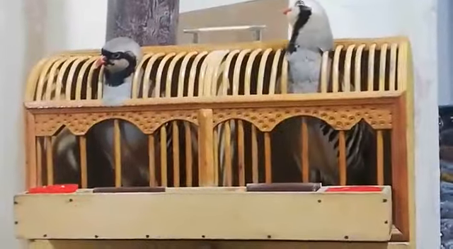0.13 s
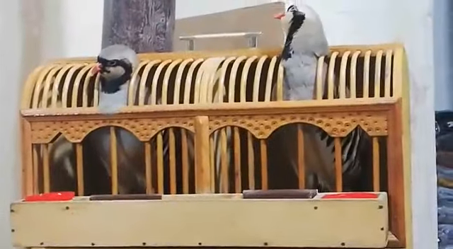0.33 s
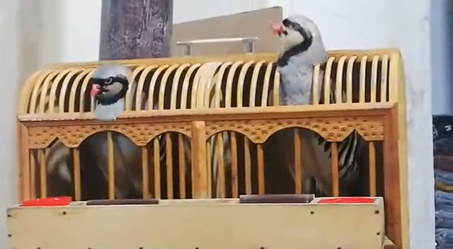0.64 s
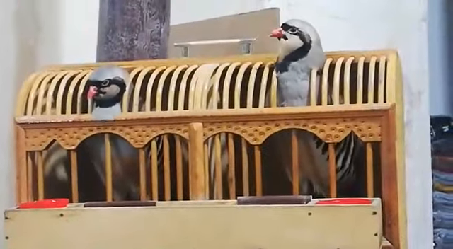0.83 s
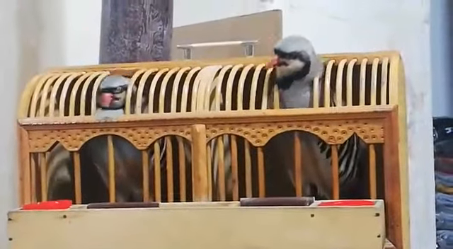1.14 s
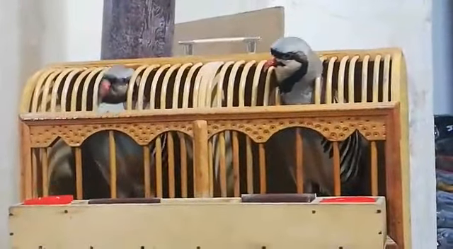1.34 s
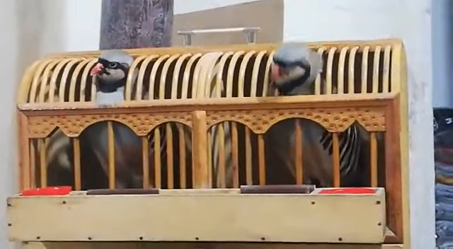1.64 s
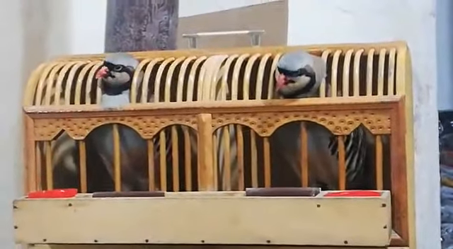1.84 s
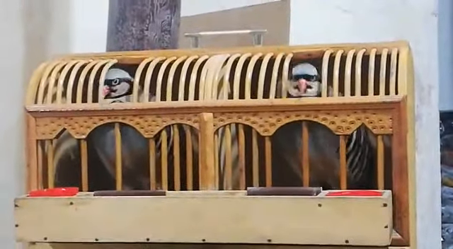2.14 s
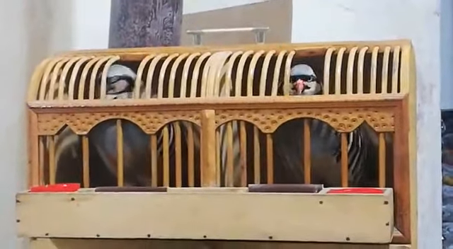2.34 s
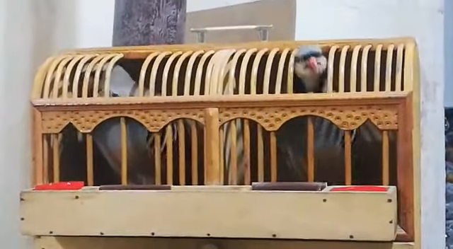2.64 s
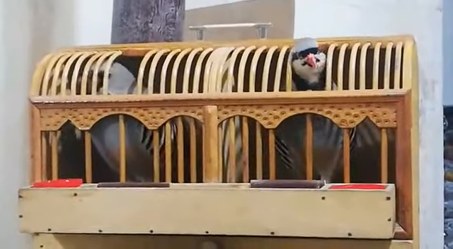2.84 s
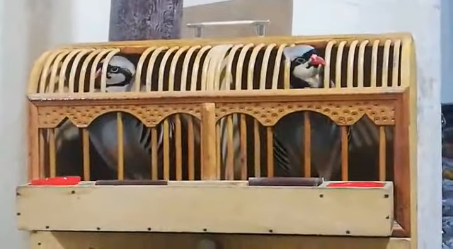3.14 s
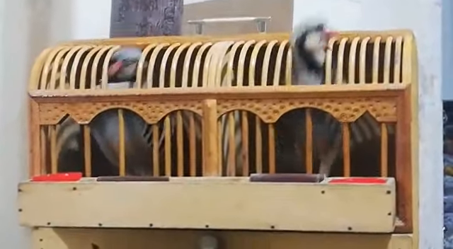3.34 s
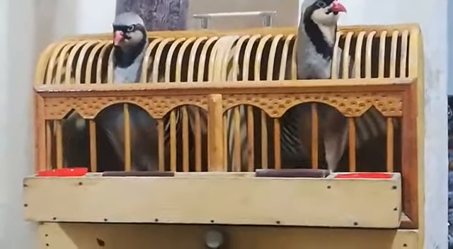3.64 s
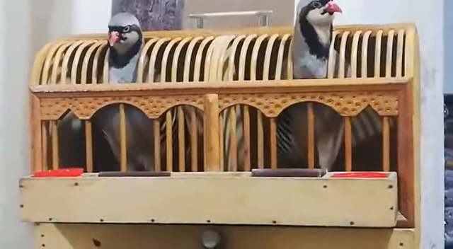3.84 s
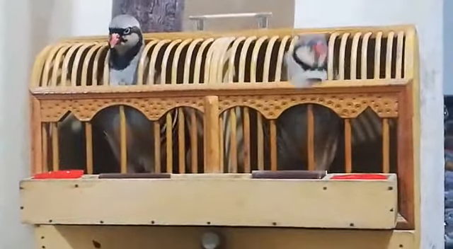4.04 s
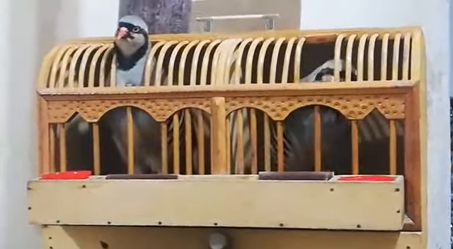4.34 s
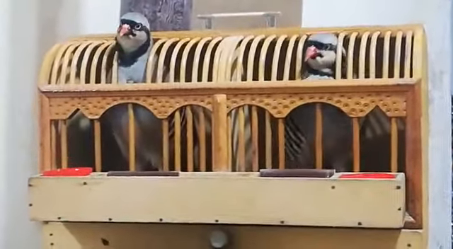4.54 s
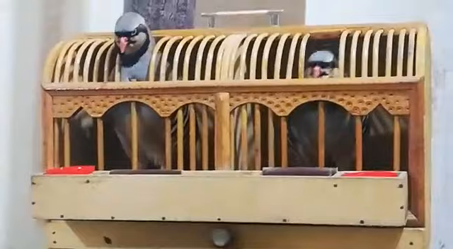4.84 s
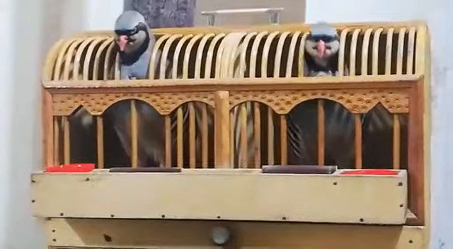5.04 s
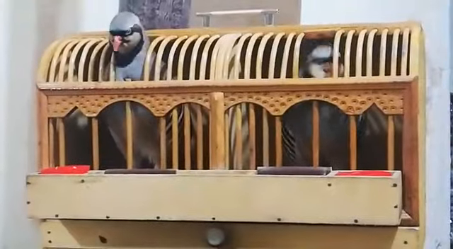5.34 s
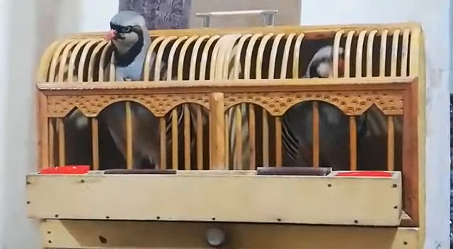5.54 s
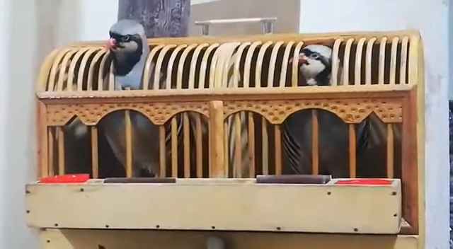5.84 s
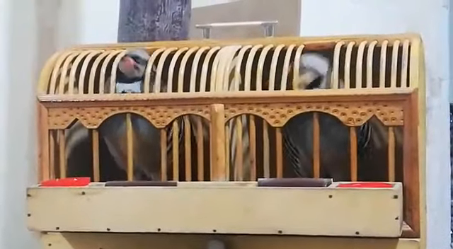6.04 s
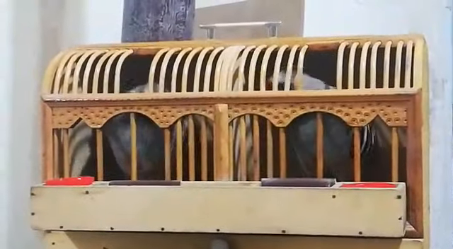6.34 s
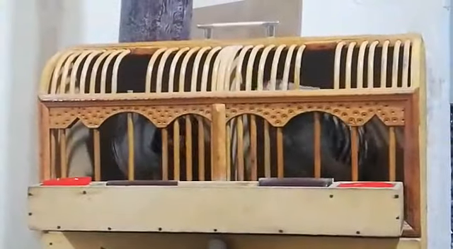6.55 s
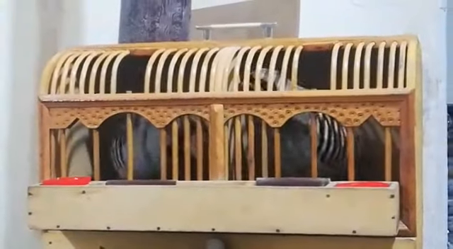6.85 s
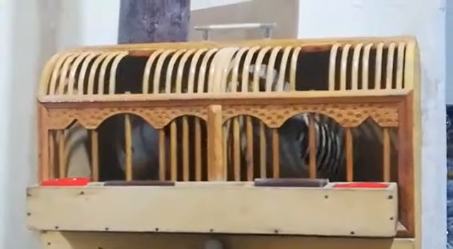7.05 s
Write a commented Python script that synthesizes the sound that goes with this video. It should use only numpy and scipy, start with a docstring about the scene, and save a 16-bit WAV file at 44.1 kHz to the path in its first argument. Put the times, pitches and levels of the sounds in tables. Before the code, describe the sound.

Two caged partridges give rasping, arching squeals and hollow low clucks, thickening into steady clucking chatter, with shuffling and light wooden bumps in a small room.

```python
"""Two partridges squabble in a wooden cage in a small, hard room, close to a two-port microphone.
Rasping squeals, most of them arching to 3-4 kHz, collapse into a croak: harmonics, half tones and noisy air.
Short hollow clucks, harmonics swept through a throat resonance, fall between them.
Shuffling is gusty filtered noise; bumps are a noise tick and decaying cage modes; two faint whistles are sine glides.
Each bird or cage sound meets fresh random echoes, over quiet room tone."""
import sys
import numpy as np
from scipy import signal
from scipy.fft import rfft, irfft
from scipy.io import wavfile
from scipy.ndimage import uniform_filter1d

SR = 44100
rng = np.random.default_rng(int(sys.argv[2]) if len(sys.argv) > 2 else 0)


def wav_out(sig):
    """Save sig, one row per channel (or a flat mono array), as 16-bit PCM at SR to the path in sys.argv[1]."""
    wavfile.write(sys.argv[1], SR, np.round(np.clip(np.atleast_2d(sig).T, -1, 1) * 32767).astype(np.int16))


N = 316805

# Squeals of the birds. Each row: start in seconds, rise in seconds, fall in seconds, croak in seconds,
# foot pitch in Hz, top pitch in Hz, level at the top in dB, level where the croak starts in dB, base rasp (0-1),
# overtone slope in dB per octave before loudness brightens it, left minus right in dB before the port tilt.
SQUEAL_NOTES = [ (0.052, 0.054, 0.045, .02, 2664, 2900, -35.5, -46, 0.26, -9, -2),
                (0.067, 0.017, 0.031, 0.021, 3180, 3874, -35, -35.5, 0.4, -16, -1),
                (0.158, .015, 0.062, 0.031, 1450, 1610, -34, -33.5, 0.59, -7, 0.5),
                (0.33, 0.049, 0.037, 0.033, 1350, 1828, -37.5, -35, 0.53, -6.5, 0.5),
                (0.358, 0.022, .035, 0.017, 2700, 2880, -38, -40, 0.23, -9, 3),
                (0.434, .027, .062, .042, 3817, 4130, -33, -32, 0.45, -12.5, 2),
                (0.557, 0.033, 0.037, .02, 2490, 2836, -30.5, -33.5, 0.42, -9.5, -1),
                (0.672, .02, 0.077, 0.035, 1496, 1682, -29, -39.5, 0.64, -9, -1),
                (0.912, .055, 0.032, 0.019, 3380, 4160, -32, -69, 0.04, -18.5, 3.5),
                (1.008, 0.0052, 0.0049, 0.027, 2045, 2214, -38, -30.5, 0.17, -6.5, 0.5),
                (1.01, .04, .03, 0.051, 2127, 3690, -29.5, -32, 0.13, -10.5, -0.5),
                (1.238, 0.038, 0.027, 0.031, 2652, 2835, -30, -36.5, 0.37, -10.5, 2),
                (1.286, 0.026, 0.041, 0.056, 3685, 3940, -31.5, -30, 0.14, -15, 2),
                (1.52, 0.03, 0.0072, 0.058, 2496, 3843, -26, -35, 0, -11.5, -1),
                (1.567, 0.015, .048, .02, 2685, 2834, -31, -59, .45, -9, 1),
                (1.634, 0.026, 0.043, .05, 3720, 3930, -29.5, -30.5, 0.2, -10, 2),
                (1.896, 0.038, 0.011, 0.023, 2597, 3275, -35, -36.5, .2, -9, 1),
                (1.953, 0.034, 0.061, 0.056, 2684, 3890, -26, -27, 0.4, -9, 0),
                (2.246, 0.055, 0.041, 0.037, 2903, 3564, -28, -31, 0.17, -9, 1),
                (2.445, 0.044, 0.091, 0.045, 2830, 4103, -30.5, -27.5, 0.31, -8.5, 0.5),
                (3.037, 0.031, 0.042, 0.033, 2600, 3513, -28, -34.5, 0.02, -10, -1),
                (3.288, 0.02, 0.035, 0.032, 2643, 3350, -31.5, -32.5, 0.61, -9.5, -1.5),
                (3.67, 0.033, 0.051, .05, 2800, 4010, -28, -32.5, 0, -5.5, 0.5),
                (3.912, 0.039, 0.038, 0.033, 2290, 3104, -34.5, -35.5, 0.4, -8.5, -0.5),
                (4.347, 0.044, 0.037, 0.044, 2907, 3686, -31.5, -33.5, 0.1, -7.5, 0),
                (4.785, .033, 0.029, 0.037, 2700, 3438, -28.5, -38, 0.06, -11, 1.5),
                (5.107, .035, 0.046, 0.024, 2728, 2852, -30, -31, .08, -8, -1.5),
                (5.539, 0.037, 0.056, 0.034, 2677, 3340, -27.5, -31, 0, -7, -0.5),
                (5.697, .035, .08, 0.024, 2403, 3188, -31, -30.5, 0.33, -5.5, 2.5),
                (5.835, 0.04, 0.038, 0.06, 2904, 3047, -26.5, -34, 0.17, -8, -3),
                (6.263, 0.026, 0.056, 0.087, 2900, 3279, -26, -37, 0.04, -7, -1.5)]
# Clucks of the birds. Each row: start in seconds, length scale in seconds, reference pitch in Hz,
# level in dB before the swell and a small common boost, lift of the overtones as the beak opens in dB.
CLUCK_NOTES = [(0.0, 0.0096, 671, -40.5, 27.5), (0.876, 0.034, 609, -45.5, 22),
               (1.456, 0.035, 646, -37.5, 20.5), (1.572, 0.061, 746, -46.5, 45),
               (1.807, 0.03, 655.5, -34.5, 19.5), (1.873, 0.036, 647, -39, 22.5),
               (2.302, 0.028, 731, -37, -8), (2.673, 0.027, 686, -41.5, 19), (2.856, 0.037, 928, -34, 8.5),
               (3.172, 0.023, 985, -33.5, 10.5), (3.259, 0.032, 1032, -41, 0), (3.489, 0.059, 969, -35, 2),
               (3.568, 0.035, 1020, -38.5, 4), (3.75, 0.095, 1012, -40.5, 16), (3.922, 0.04, 757, -39, -27),
               (4.025, 0.035, 1028, -35, 13.5), (4.102, 0.032, 999, -37.5, -19),
               (4.21, 0.045, 654, -30.5, 3.5), (4.386, 0.024, 868, -36.5, 5), (4.486, 0.038, 754, -38, 9),
               (4.521, 0.032, 613, -36.5, 8), (4.671, 0.036, 633.3, -29.5, 5),
               (4.708, 0.027, 587.4, -34, 10), (4.865, 0.028, 874, -34.5, 22),
               (4.967, 0.045, 856, -33.5, 8), (5.163, 0.041, 641.5, -30.5, 14.5),
               (5.239, 0.025, 558, -31.5, -2), (5.396, 0.047, 883, -34.5, 8.5),
               (5.525, 0.04, 980, -33, -16), (5.725, 0.032, 708, -32.5, 17.5),
               (5.837, 0.0356, 595, -31.5, -7), (6.01, 0.048, 693, -30, 14),
               (6.123, 0.031, 585, -28.5, 14.5), (6.309, 0.044, 691, -32.5, 16),
               (6.422, 0.032, 654.4, -40, 21.5), (6.441, 0.027, 573.5, -31.5, -17),
               (6.578, 0.015, 872, -38.5, -20), (6.618, 0.031, 752, -33.5, 11.5),
               (6.683, 0.024, 918, -39, 13), (6.73, 0.033, 739, -37.5, 4), (6.758, 0.028, 609, -33.5, 12.5),
               (6.888, 0.037, 876, -42.5, 12), (6.928, 0.027, 716, -33.5, 12.5),
               (7.036, 0.028, 803, -34.5, -23), (7.07, 0.022, 587, -28, 14.5)]
# Feet and bodies hitting the cage. Each row: start in seconds, tick level in dB, thud level in dB
# (the thud is added to the level of each cage mode).
CAGE_BUMPS = [(0.085, -47, -56.5), (1.564, -41, -49.5), (2.774, -40.5, -57), (3.307, -36.5, -51.5),
              (4.059, -63, -49), (6.913, -45, -50), (6.963, -34, -55), (7.043, -35, -70)]
# Feathers and feet shuffling, joined by straight lines. Each row: time in seconds, level in dB.
SHUFFLE_LEVEL = [(0, -71.5), (3.2, -61.5), (3.85, -53.5), (4.5, -60), (6.85, -62.5), (6.95, -48.5),
                 (7.18, -59)]
# Throat resonance over the squeal's harmonics. Each row: frequency in Hz, gain in dB.
SQUEAL_THROAT_SPECTRUM = [(350, -25), (650, 1), (1500, 11.5), (2300, 1.5), (3100, 2), (4000, 4), (4900, 3),
                          (5800, -4.5), (7000, -5), (9500, -15.5), (12500, -3), (15500, -26)]
# Breath noise in a pressed squeal. Each row: frequency in Hz, gain in dB.
RASP_AIR_SPECTRUM = [(400, -46), (700, -49), (1500, 6), (2300, 3), (3200, 7.5), (4100, -2), (5000, -1.5),
                     (7000, -10.5), (9500, -13), (12500, -33), (15500, -22)]
# Hollow throat resonance of the cluck. Each row: frequency in Hz, gain in dB.
CLUCK_THROAT_SPECTRUM = [(240, -17.5), (450, -26.5), (620, -8.5), (900, 6.5), (1200, 10), (1500, -2),
                         (1900, -23), (2700, -27.5), (4400, -31), (5400, -35), (6600, -37), (11000, -50.5)]
# Colour of the shuffling. Each row: frequency in Hz, gain in dB.
RUSTLE_SPECTRUM = [(70, -17.5), (200, -1), (1000, -7.5), (3000, -15), (15000, -37.5)]
# Colour of the steady room tone. Each row: frequency in Hz, gain in dB.
ROOM_TONE_SPECTRUM = [(20, 0), (60, 10), (200, -6.5), (700, 14), (2000, -27.5), (6000, -11), (15000, -19)]
# Ringing modes of the wooden cage. Each row: centre frequency in Hz, relative level in dB, 60 dB decay in seconds.
CAGE_MODES = [(138.3, -3, 0.25), (211, 1, 0.3), (294, 8.5, 0.085), (387, 9, 0.084), (810, 24.5, 0.0095)]
# Colour difference between the ports. Each row: frequency in Hz, left minus right in dB.
PORT_TILT = [(150, -1.5), (600, 5.5), (1400, -2.5), (2800, -3), (4500, 5), (7500, 2), (12500, -4.5)]
# Thin far whistles. Each row: start in seconds, length in seconds, start pitch in Hz, end pitch in Hz, peak level in dB.
FAR_WHISTLES = [(2.783, 0.12, 4650, 4010, -57), (4.517, 0.16, 4980, 5520, -59)]

# Tail decay; tail and early-echo energies against the direct sound
ROOM_T60_S, ROOM_DB, EARLY_DB = 0.31, -2.5, 1.5
TOP_HZ = 15700  # upper limit of voices and recorder

# A squeal starts with a low-register scoop, jumps up to an arch of effort, then breaks and sinks as a croak.
SCOOP_S, SCOOP_FROM_HZ, SCOOP_TO_HZ = 0.014, 1400, 1903  # the scoop ends no higher than the foot pitch
SCOOP_DB, SCOOP_RASP = -11.5, 0.572  # level against the top
RISE_CURVE, FALL_CURVE = 1.7, 2.1  # higher is a flatter top
ONSET_DB, BREAK_DB, FOOT_RASP = -5, -7.5, 0.258  # level against the top, and added rasp, at the feet
CROAK_FROM_HZ, CROAK_TO_HZ = 2300, 710  # the croak starts no higher than the foot pitch
CROAK_FADE_DB, CROAK_RASP = -6.5, 0.562


def undb(db):
    """Decibels to gain."""
    return 10 ** (np.asarray(db) / 20)


def unit(x):
    """Scale to rms 1."""
    return x / np.sqrt(np.mean(x ** 2) + 1e-18)


def response(points, hz):
    """Gain of a (Hz, dB) spectrum at the given frequencies, interpolated over log frequency."""
    f, db = np.transpose(points)
    return undb(np.interp(np.log(np.maximum(hz, 1)), np.log(f), db))


def colour(x, points):
    """Filter by a (Hz, dB) spectrum."""
    hz = np.linspace(0, SR / 2, len(x) // 2 + 1)
    return irfft(rfft(x) * response(points, hz), len(x))


def wobble(t, rate):
    """Bounded random wander of rms 1, reaching a new value rate times a second."""
    values = rng.uniform(-1, 1, 2048)
    return unit(np.interp((t - t[0]) * rate, np.arange(2048), values))


def integrate(hz):
    """Phase in radians of a moving pitch."""
    return 2 * np.pi * np.cumsum(hz) / SR


def voice(phase, hz, throat, slope_db, lift_db, count):
    """Syrinx harmonics shaped by the throat, at constant power; lift raises those above about 1.4 kHz."""
    k = np.arange(1, count + 1)[:, None]
    above = np.clip((k * hz - 1400) / 500, 0, 1)
    gain = response(throat, k * hz) * undb(slope_db * np.log2(k) + lift_db * above)
    gain = gain * (k * hz < TOP_HZ)
    lag = 2 * np.pi * rng.random((count, 1))  # the throat delays each harmonic differently
    harmonics = (gain * np.sin(k * phase + lag)).sum(0)
    return np.sqrt(2) * harmonics / np.sqrt((gain ** 2).sum(0))


def cluck(length, pitch, db, lift_db, jitter=0.0377, shimmer=0.25, air_db=-15, tail=0.51):
    """A low note: pitch scoops up under the hollow throat resonance, then sinks as the pressure goes."""
    t = np.arange(int(max(length, .01) * 4.8 * SR)) / SR
    stage = [0, .2, .5, 1, 1.6]  # in lengths; silent after the last
    glide = np.interp(t / length, stage, [.86, .96, 1.05, .92, 0.354])
    hz = pitch * (glide + jitter * wobble(t, 498.6))
    swell = np.interp(t / length, stage, [0, .45, 1.4, tail * 2.41, 0])
    # harmonics flare as they sweep through the resonance
    tone = voice(integrate(hz), hz, CLUCK_THROAT_SPECTRUM, slope_db=-2, lift_db=lift_db, count=14)
    air = unit(colour(rng.standard_normal(len(t)), CLUCK_THROAT_SPECTRUM))
    flicker = np.exp(shimmer * wobble(t, 354.4))
    return undb(db) * swell * unit(flicker * (tone + undb(air_db) * air))


def shuffle(t):
    """Feathers and feet rub the cage: dull noise in irregular gusts, following the shuffle levels."""
    gusts = rng.standard_normal(N) * undb(5.0 * wobble(t, 90))
    scuffs = unit(colour(gusts, RUSTLE_SPECTRUM))
    return scuffs * undb(np.interp(t, *np.transpose(SHUFFLE_LEVEL)))


def room_tone():
    """The steady quiet of the place: coloured noise, independent of the birds."""
    return undb(-61.5) * unit(colour(rng.standard_normal(N), ROOM_TONE_SPECTRUM))


def arch(start, rise, fall, croak, foot_hz, top_hz, top_db, croak_db, top_rasp, attack_s=.008, release_s=0.012):
    """Time, pitch, level, rasp and gate of one squeal: a scoop, an arch of effort, a croak."""
    crest = start + rise
    breaks = crest + fall
    end = breaks + croak
    t = np.arange(int((start - SCOOP_S - attack_s) * SR), int((end + release_s) * SR)) / SR
    rising = t < crest
    # slack is 0 at the crest and 1 at either foot
    rise_slack = np.clip((crest - t) / rise, 0, 1) ** RISE_CURVE
    fall_slack = np.clip((t - crest) / fall, 0, 1) ** FALL_CURVE
    slack = np.where(rising, rise_slack, fall_slack)
    sunk = np.clip((t - breaks) / croak, 0, 1)
    scoop_hz = np.interp(t, [start - SCOOP_S, start], [SCOOP_FROM_HZ, min(SCOOP_TO_HZ, foot_hz)])
    croak_hz = min(CROAK_FROM_HZ, foot_hz) ** (1 - sunk) * CROAK_TO_HZ ** sunk
    arch_db = top_db + np.where(rising, ONSET_DB, BREAK_DB) * slack
    low_register = [t < start, t > breaks]
    pitch = np.select(low_register, [scoop_hz, croak_hz], top_hz + (foot_hz - top_hz) * slack)
    db = np.select(low_register, [top_db + SCOOP_DB, croak_db + CROAK_FADE_DB * sunk], arch_db)
    rasp = np.select(low_register, [SCOOP_RASP, CROAK_RASP], top_rasp + FOOT_RASP * slack)
    # the jumps between registers take about three milliseconds
    pitch, db, rasp = uniform_filter1d(np.array([pitch, db, rasp]), size=128, axis=1)
    gate = np.interp(t, [t[0], start - SCOOP_S, end, t[-1]], [0, 1, 1, 0])
    return t, pitch, db, np.clip(rasp, .1, 1), gate


def squeal(note, slope_db, quaver=0.0237, warble_hz=38, collapse_hz_per_s=80000, jitter_hz=330, shimmer=0.5,
           half_db=-14, second_hz=2850, second_db=-2, air_db=-3, growl_hz=660, growl_db=-8, bright=0.53):
    """One arching note: a whistle that breaks into two tones, half tones and chaos as the rasp grows."""
    t, pitch, db, rasp, gate = arch(*note)
    # a steep fall in pitch always turns rough
    rasp = np.maximum(rasp, np.clip(-np.gradient(pitch) * SR / collapse_hz_per_s, 0, .5))
    # the membranes warble and quaver, and lose their period when pressed hard
    warble = np.sin(2 * np.pi * (warble_hz * t + rng.random())) + np.sqrt(rasp) * wobble(t, 256.1)
    hz = pitch * (1 + quaver * warble) + jitter_hz * rasp ** 1.402 * wobble(t, 1000)
    phase = integrate(hz)
    # louder notes are richer in overtones
    slope_db = slope_db + bright * np.clip(db + 31, -3, 5)
    tone = voice(phase, hz, SQUEAL_THROAT_SPECTRUM, slope_db=slope_db, lift_db=9.0, count=10)
    # alternate strong and weak cycles put lines halfway between the harmonics
    half_depth = undb(half_db) * np.sqrt(rasp) * np.clip(hz / 1000 - 1, 0, 2)
    halves = half_depth * np.cos(phase / 2 + rasp * wobble(t, 500))
    # on the highest notes the other side of the syrinx stays behind on its own lower pitch
    second = np.sin(integrate(second_hz + jitter_hz * rasp * wobble(t, 654)))
    second = undb(second_db) * second * np.clip((pitch - 3500) / 300, 0, 1) * np.sqrt(2 * rasp)
    flicker = unit(np.exp(shimmer * np.sqrt(rasp) * wobble(t, 500)))
    tone = (tone * (1 + halves) + second) * flicker
    # breath pulses with each cycle and in irregular bursts
    breath = rng.standard_normal(len(t)) * (1 + np.cos(phase)) * np.exp(2.6 * wobble(t, 256.9))
    air = unit(colour(breath, RASP_AIR_SPECTRUM))
    # a low growl comes and goes beneath the pressed parts
    low_hz = growl_hz * (1 + 0.0472 * wobble(t, 149.5))
    growl = voice(integrate(low_hz), low_hz, SQUEAL_THROAT_SPECTRUM, slope_db=-14, lift_db=18.0, count=5)
    air = air + undb(growl_db) * growl * np.clip(1 + wobble(t, 42.6), 0, 2)
    mix = tone * np.sqrt(1 - rasp ** 2) + undb(air_db) * rasp ** 2.2 * air
    return t[0], gate * undb(db) * mix


def bump(tick_db, thud_db, tick_s=0.0072, push_s=0.0009):
    """A claw ticks on a slat and a soft body sets the wooden box ringing in decaying modes."""
    t = np.arange(SR // 3) / SR
    ring = np.zeros(len(t))
    for hz, db, t60 in CAGE_MODES:
        detune = 1 + 0.07 * rng.standard_normal()  # each bump shifts the modes a little
        ring += undb(db - 60 * t / t60) * np.sin(2 * np.pi * hz * t * detune)
    tick = unit(colour(rng.standard_normal(len(t)), [(300, -35), (3000, 4), (15000, -8)]))
    thud = undb(thud_db) * ring * (1 - np.exp(-t / push_s))
    return thud + undb(tick_db) * tick * np.exp(-t / tick_s)


def whistle(length, start_hz, end_hz, db):
    """A faint pure glide that swells and fades."""
    n = int(length * SR)
    return undb(db) * np.hanning(n) * np.sin(integrate(np.linspace(start_hz, end_hz, n)))


def room(x, lag):
    """Direct sound, a handful of echoes from cage and wall, then a short diffuse tail."""
    t = np.arange(SR // 2) / SR
    tail = rng.standard_normal(len(t)) * undb(-60 * t / ROOM_T60_S)
    tail = tail * np.clip(t / 0.03, 0, 1)  # builds up over 30 ms
    echo = undb(ROOM_DB) * tail / np.linalg.norm(tail)
    count = 12
    places = (SR * (.001 + .022 * rng.random(count))).astype(int)  # 1 to 23 ms
    echo[places] += undb(EARLY_DB) * rng.choice([-1, 1], count) / np.sqrt(count)
    echo[lag] += 1
    return signal.fftconvolve(x, echo)


def add(ports, start, sound, pan_db=0):
    """Send a sound through the room to both ports; the heads keep moving, so each note meets new echoes."""
    i = max(0, int(start * SR))
    # the direct sound is a few samples late at the right port, less so from 3 s on
    late = 6 if start < 3 else 2
    for port, lag, db in zip(ports, (0, late), (pan_db / 2, -pan_db / 2)):
        heard = undb(db) * room(sound, lag)[:N - i]
        port[i:i + len(heard)] += heard


def microphone(ports):
    """The two ports differ in colour, and long waves are nearly the same at both."""
    left = colour(ports[0], [(hz, db / 2) for hz, db in PORT_TILT])
    right = colour(ports[1], [(hz, -db / 2) for hz, db in PORT_TILT])
    mid = (left + right) / 2
    side = colour((left - right) / 2, [(140, -13), (400, -4), (1500, -1)])
    return np.array([mid + side, mid - side])


def scene():
    """Both birds and their cage, heard close on two microphone ports over quiet room tone."""
    t = np.arange(N) / SR
    ports = np.zeros((2, N))
    for start, *note in CLUCK_NOTES:
        add(ports, start, undb(0.65) * cluck(*note))
    add(ports, 0, shuffle(t))
    for *note, slope_db, pan_db in SQUEAL_NOTES:
        add(ports, *squeal(note, slope_db), pan_db)
    for start, tick_db, thud_db in CAGE_BUMPS:
        add(ports, start, bump(tick_db, thud_db))
    for start, *glide in FAR_WHISTLES:
        add(ports, start, whistle(*glide))
    return microphone(ports) + room_tone()  # the same tone at both ports


def record(dry):
    """The recorder cuts the top with a steep elliptic low-pass."""
    low_pass = signal.ellip(10, .2, 80, TOP_HZ, fs=SR, output="sos")
    return signal.sosfilt(low_pass, dry)


dry = scene()
out = record(dry)
wav_out(out)
```